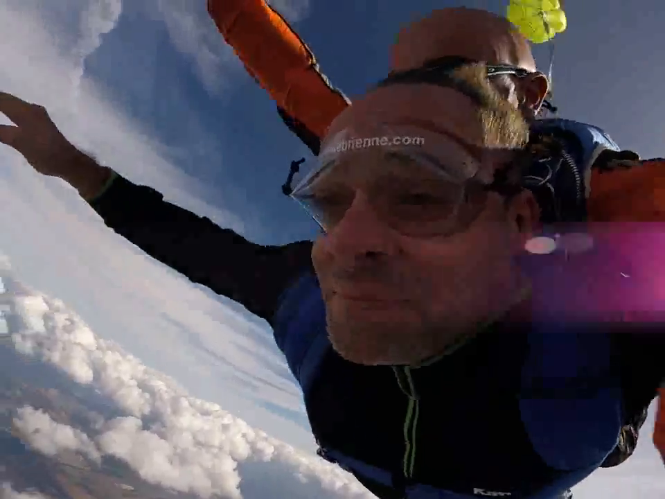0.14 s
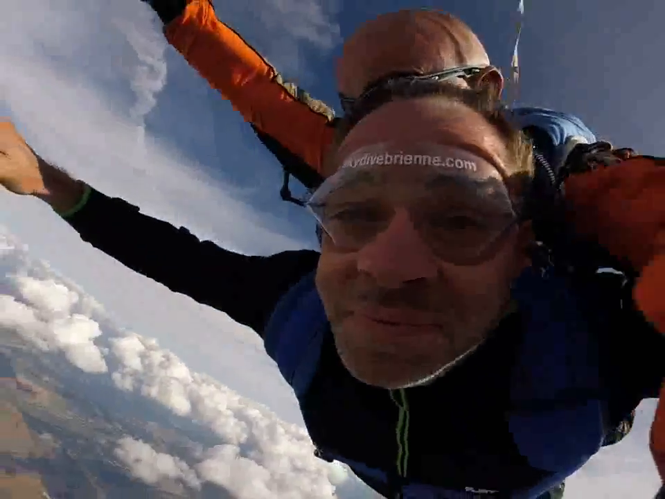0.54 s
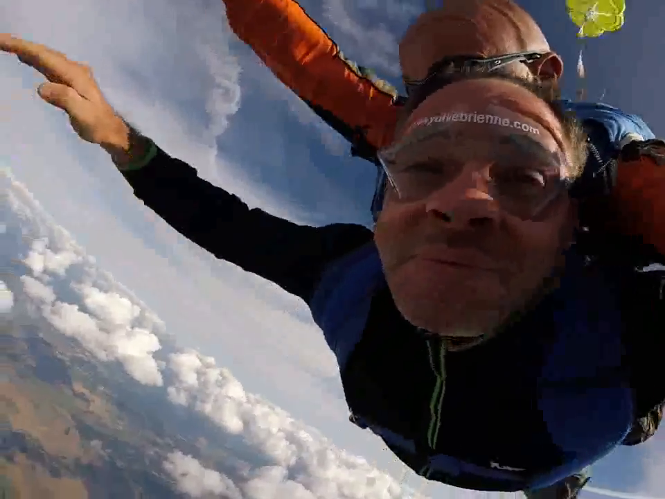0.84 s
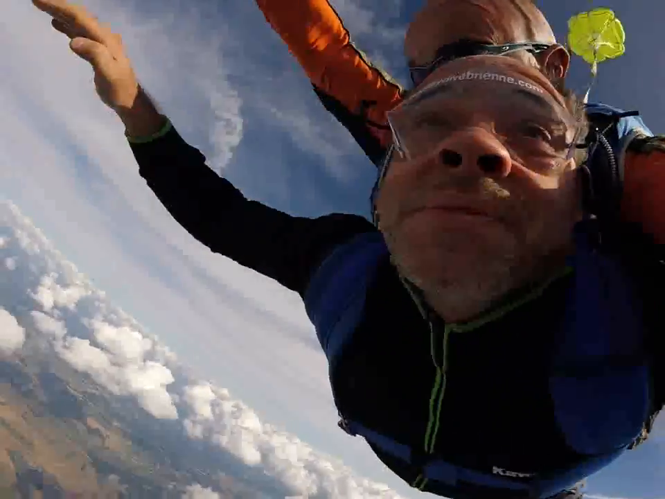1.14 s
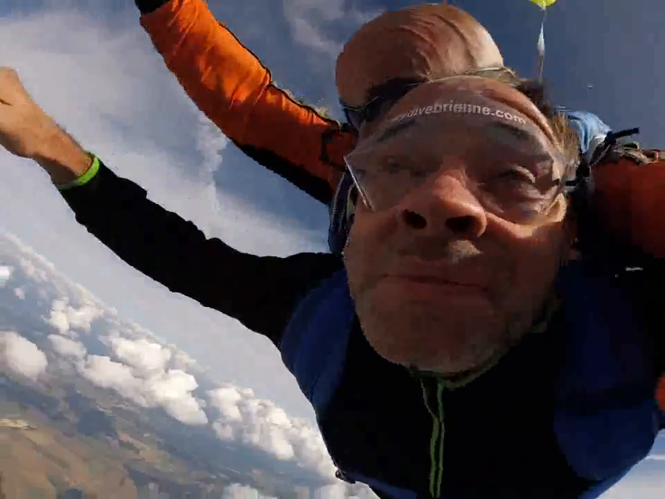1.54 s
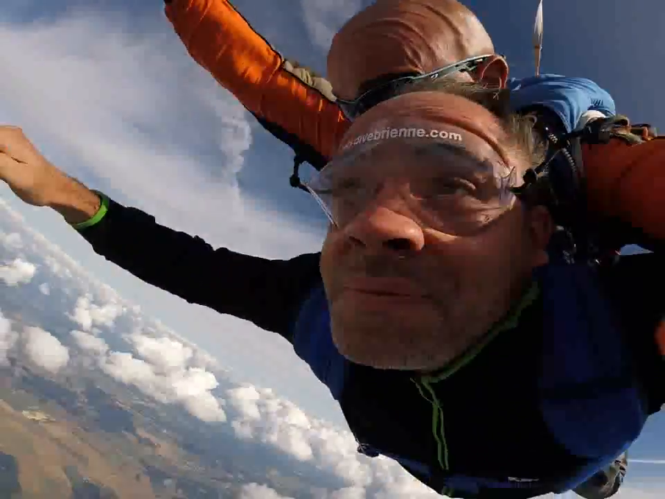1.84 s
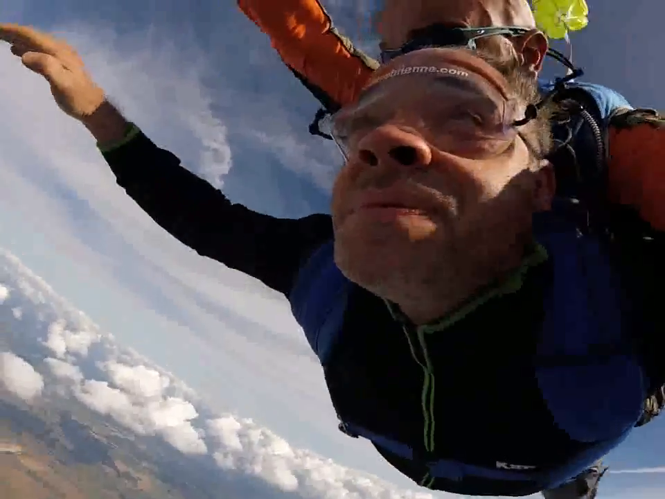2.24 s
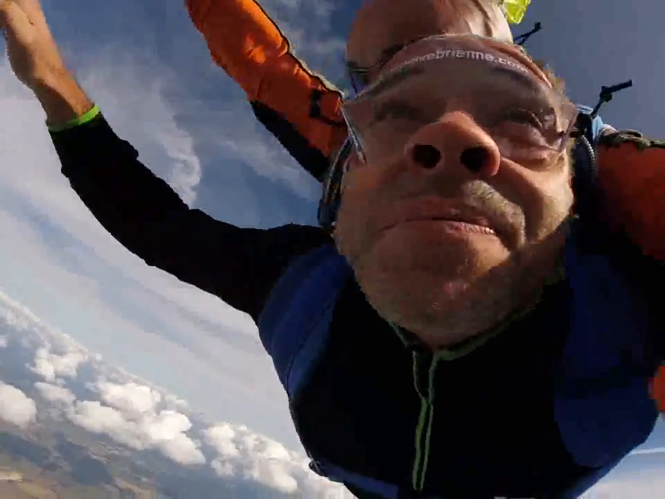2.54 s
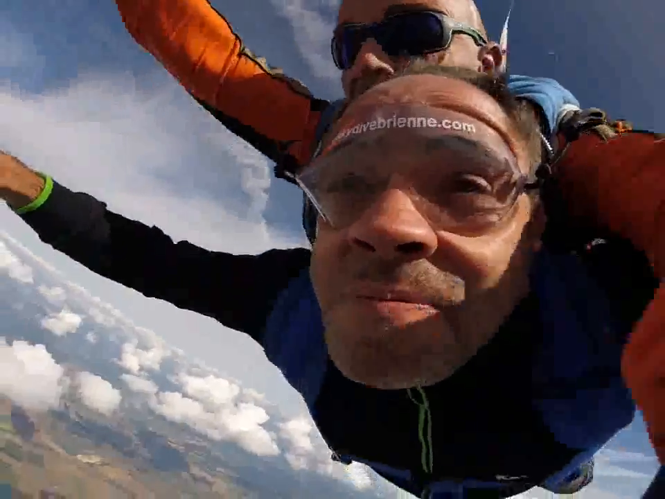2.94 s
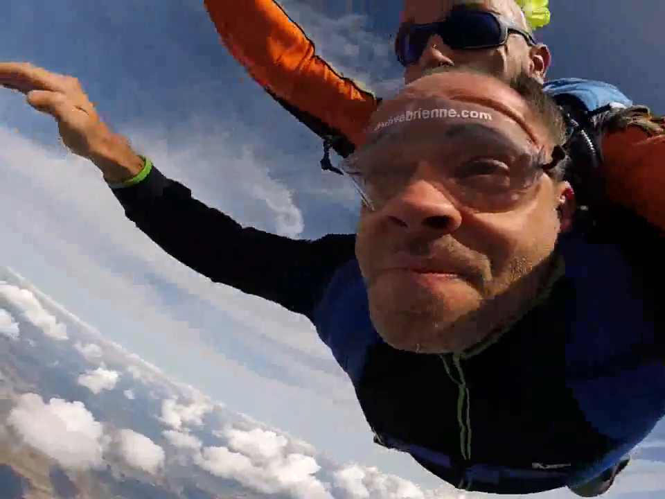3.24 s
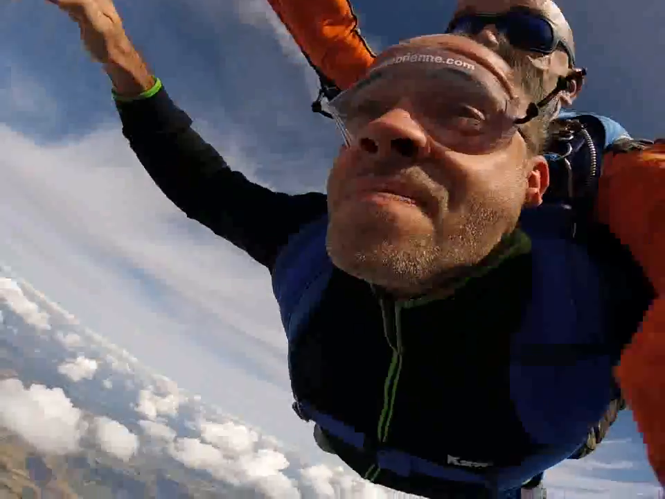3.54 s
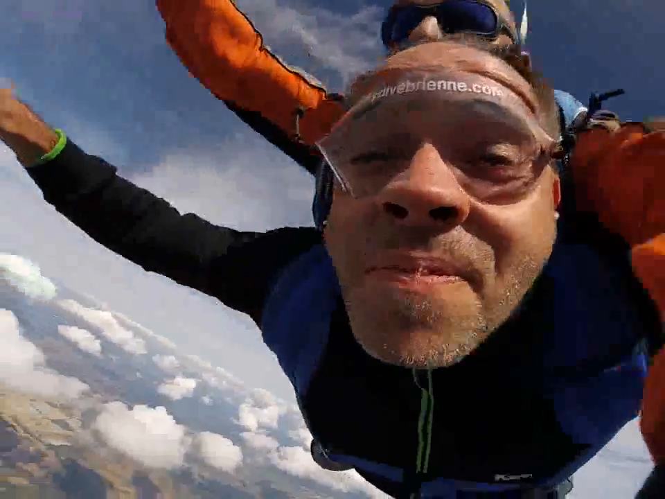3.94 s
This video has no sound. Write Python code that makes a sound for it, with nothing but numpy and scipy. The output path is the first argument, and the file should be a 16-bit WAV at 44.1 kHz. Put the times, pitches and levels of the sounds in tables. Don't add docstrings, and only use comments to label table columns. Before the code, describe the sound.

For about four seconds, a loud, continuous rush of freefall air batters a small cased camera microphone, already at full force and ending without fading. A heavy low rumble thumps quickly and irregularly, easing briefly near 0.5 to 0.9, 1.6, 2.3 and 3.3 s. Over it sit a hollow, noisy drone, swelling gently about once a second, and a broad, breathy low howl whose pitch and strength wander without becoming a clear note. Rougher mid roar surges near 0.15, 1.1 to 1.3, 2.3 to 2.4 and 3.4 to 3.7 s. Grainy hiss, a faint airy ring and thin fizz flutter in rapid, tiny bursts, weaker around 1.1 s. The hiss flickers away for instants, clustered around 1.9 to 2.3 and 3.05 to 3.35 s, with a longer dip near 3.6 s. Close, dry and mono; peaks are flattened and the highest treble is dulled.

```python
import sys
import numpy as np
from scipy import signal
from scipy.fft import rfft, irfft, next_fast_len
from scipy.io import wavfile
from scipy.ndimage import uniform_filter1d, minimum_filter1d, map_coordinates

SR = 44100
rng = np.random.default_rng(int(sys.argv[2]) if len(sys.argv) > 2 else 0)


def dump(signal):
    limited = np.clip(np.atleast_2d(signal).T, -1, 1)
    pcm = np.round(limited * 32767).astype(np.int16)
    wavfile.write(sys.argv[1], SR, pcm)


def magnitude_from_level(level_db):
    exponent = np.asarray(level_db, float) / 20
    return 10 ** exponent


N = 180280

# (time [s], length [s], loss of buffet [dB], loss of drone [dB])
SHELTER = [(.55, .1, 1, 2.5), (.78, 0.094, 1, 5.5), (.92, 0.079, 4, 0.5), (1.6, 0.099, 2, 1),
           (1.75, 0.045, 2, -1.5), (2.05, .05, 0.5, 2), (2.27, 0.047, 1.5, 0), (3.0, 0.049, -0.5, 4),
           (3.28, .07, 2.5, 1), (3.68, 0.041, 2, 2.5), (3.9, 0.083, 0, 4.5)]


def buffet():
    # (frequency [Hz], level [dB per Hz])
    thump_spectrum = [(12, -43), (25, -2.5), (48, -4.5), (58, -1), (69, 1.5), (84, -3.5), (120, -2.5),
                      (155, -1), (220, -5), (390, -9), (480, -11.5), (700, -37.5), (3000, -120)]
    thumps = evened(coloured(rng.standard_normal(N), thump_spectrum), hz=9.9, share=0.43)
    level_db = rocking(mean_db=-12.5, swing_db=-0.3, crest_s=-0.6, drift_db=0.2) - bells(SHELTER)
    return magnitude_from_level(level_db) * thumps


def howl():
    # (time [s], strength [dB], shedding rate [Hz])
    shedding = [(0.0, -11.5, 273.6), (0.14, -17, 248), (0.32, -13, 291.3), (0.35, -13, 266.7),
                (0.6, -13, 288.1), (0.98, -17, 276.5), (1.08, -12, 260.2), (1.22, -17, 259),
                (1.52, -11.5, 287.5), (2.4, -16.5, 268.4), (2.48, -12, 267), (2.61, -15, 271),
                (2.7, -12.5, 264.9), (3.3, -16, 291.6), (3.37, -15, 265.2), (3.63, -17.5, 251.2),
                (3.75, -12, 280), (4.09, -12.5, 287.4)]
    shed_db, shed_hz = curves(shedding)
    slow = filtered(rng.standard_normal((2, N)), lambda hz: 1 / (1 + (hz / 80) ** 4))
    phase = 2 * np.pi * np.cumsum(1.06 * shed_hz) / SR
    band = unit(slow[0] * np.cos(phase) + slow[1] * np.sin(phase))
    level_db = -15.5 + 1.55 * (shed_db - shed_db.mean())
    return magnitude_from_level(level_db) * evened(band, hz=25, share=0.24)


def drone():
    # (frequency [Hz], level [dB per Hz])
    drone_spectrum = [(100, -120), (330, -6), (480, -1.5), (600, -0.5), (800, -1.5), (1100, -16),
                      (4000, -120)]
    air = coloured(rng.standard_normal(N), drone_spectrum)
    level_db = rocking(mean_db=-19.5, swing_db=1.8, crest_s=0, drift_db=-0.26) - bells(SHELTER, column=3)
    return magnitude_from_level(level_db) * air


def roar(burst):
    # (frequency [Hz], level [dB per Hz])
    roar_spectrum = [(150, -120), (600, -13), (900, -0.5), (1300, -4.5), (1800, -12.5), (2600, -37),
                     (8000, -120)]
    # (time [s], length [s], gain [dB])
    gusts = [
        (.14, .07, 3),
        (1.1, .08, 1.5),
        (1.29, 0.043, 3.5),
        (2.26, .04, 1.5),
        (2.39, .06, 2.5),
        (3.43, 0.093, 3.5),
        (3.68, .05, 2.5),
    ]
    air = coloured(eddies(burst, depth_db=1.5), roar_spectrum)
    level_db = rocking(mean_db=-21.5, swing_db=0.75, crest_s=0.2, drift_db=1.14) + bells(gusts)
    return magnitude_from_level(level_db) * air


def hiss(burst, flow):
    # (frequency [Hz], level [dB per Hz])
    hiss_spectrum = [(200, -120), (600, -24), (1200, 0.5), (2000, -1), (3000, -8.5), (4300, -18),
                     (6000, -21), (16000, -120)]
    air = coloured(eddies(burst, depth_db=2.5), hiss_spectrum)
    return follow(flow, mean_db=-25.5, grows=1.6, lifts=0.7) * air


def cavity(burst, flow):
    centre, width = 5270, 1000
    ring = lambda f: (1j * f * width / (centre ** 2 - f ** 2 + 1j * f * width)) ** 2
    ringing = unit(filtered(eddies(burst, depth_db=2.0), ring))
    return follow(flow, mean_db=-37, grows=0.56, lifts=0.85) * ringing


def fizz(burst, flow):
    # (frequency [Hz], level [dB per Hz])
    fizz_spectrum = [(1000, -120), (3200, -24), (5000, -10), (6500, 6.5), (8000, -1), (10400, -6)]
    air = coloured(eddies(burst, depth_db=3.0), fizz_spectrum)
    return follow(flow, mean_db=-40, grows=1.4, lifts=0.88) * air


def port_flow():
    # (time [s], strength [dB])
    turbulence = [(0.0, -28.5), (0.15, -31.5), (0.23, -29), (0.74, -29), (1.06, -33.5), (1.41, -28.5),
                  (1.42, -31), (1.83, -29), (2.0, -32), (2.33, -32), (2.39, -29.5), (3.03, -29),
                  (3.11, -31.5), (3.44, -29), (3.62, -30.5), (3.63, -29), (3.93, -30.5), (4.09, -29)]
    # (time [s], length [s], depth [dB])
    lift_offs = [(.05, 0.0069, 7.5), (.15, 0.013, 0.5), (.33, 0.017, 2.5), (.6, 0.0096, 2.5),
                 (.93, 0.015, 0.5), (1.0, .015, 2), (1.07, .02, 2), (1.43, 0.013, 1.5), (1.58, .015, -0.5),
                 (1.9, .015, 2.5), (1.99, 0.021, 4.5), (2.08, 0.0069, 10), (2.13, 0.01, 4),
                 (2.19, 0.013, 2), (2.25, 0.017, 3), (2.31, 0.012, 6), (2.57, 0.036, 3), (3.062, 0.009, 7),
                 (3.12, 0.031, 4.5), (3.175, 0.0071, 3.5), (3.212, 0.0092, 8), (3.29, 0.0052, 7.5),
                 (3.335, 0.0059, 8), (3.47, 0.013, 1.5), (3.585, 0.044, 7), (3.95, 0.028, -0.5)]
    strength_db, = curves(turbulence)
    lift_db = -bells(lift_offs, edge=3.2)
    return strength_db - strength_db.mean(), lift_db


def follow(flow, mean_db, grows, lifts):
    strength_db, lift_db = flow
    return magnitude_from_level(mean_db + grows * strength_db + lifts * lift_db)


def bursts():
    burst = 0.22 * wobble(15) + 0.34 * wobble(45) + 1.4 * wobble(160)
    burst = unit(burst + 2.15 * wobble(500) + 3.8 * wobble(1500))
    snaps = (rng.random(N) < 45 / SR) * rng.random(N)
    return burst + signal.fftconvolve(snaps, np.hanning(61), "same")


def eddies(burst, depth_db):
    return unit(magnitude_from_level(np.abs(depth_db) * burst) * rng.standard_normal(N))


def rocking(mean_db, swing_db, crest_s, drift_db):
    rock_s = 1.164
    swell = np.cos(2 * np.pi * (np.arange(N) / SR - crest_s) / rock_s)
    return mean_db + swing_db * swell + drift_db * wobble(4.97)


def bells(rows, column=2, edge=2):
    t = np.arange(N) / SR
    return sum(row[column] * np.exp(-.5 * np.abs((t - row[0]) / row[1]) ** edge) for row in rows)


def curves(rows):
    s, *cols = np.transpose(rows)
    return [np.interp(np.arange(N) / SR, s, c) for c in cols]


def wobble(rate):
    return map_coordinates(rng.standard_normal(N // 8), [np.arange(N) * rate / SR])


def evened(x, hz, share):
    power = np.abs(filtered(x ** 2, lambda f: 1 / (1 + (f / hz) ** 2)))
    return unit(x / (power + .05) ** (share / 2))


def coloured(x, spectrum):
    return unit(filtered(x, lambda hz: magnitude_from_level(along(spectrum, hz))))


def filtered(x, response):
    m = next_fast_len(N + 8192)
    return irfft(rfft(x, m) * response(np.fft.rfftfreq(m, 1 / SR)), m)[..., :N]


def along(points, hz):
    f, v = np.transpose(points)
    return np.interp(np.log(hz + 1), np.log(f + 1), v)


def unit(x):
    return x / np.sqrt(np.mean(x ** 2) + 1e-20)


def scene():
    burst = bursts()
    flow = port_flow()
    wake = buffet() + howl() + drone()
    port = hiss(burst, flow) + cavity(burst, flow) + fizz(burst, flow)
    return (wake + roar(burst) + port)[None]


def limited(x):
    need = np.minimum(1, .93 / (np.abs(x) + 1e-9))
    gain = minimum_filter1d(need, size=41)
    gain = uniform_filter1d(uniform_filter1d(gain, size=21), size=21)
    return gain * x


def top_cut(x):
    return signal.sosfilt(signal.butter(12, 15050, fs=SR, output="sos"), x)


def record(dry):
    # (frequency [Hz], response [dB])
    mic_response = [(10400, 0), (11200, -11), (12000, -22), (12800, -20), (13700, -15), (14500, -23),
                    (15100, -33), (16000, -70)]
    mix = filtered(limited(dry), lambda hz: magnitude_from_level(along(mic_response, hz)))
    return top_cut(mix)


dry = scene()
out = record(dry)
dump(out)
```